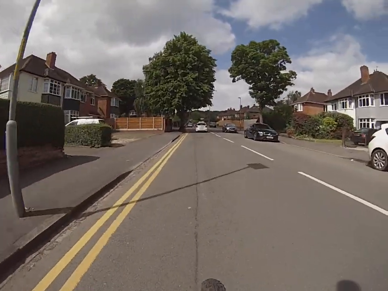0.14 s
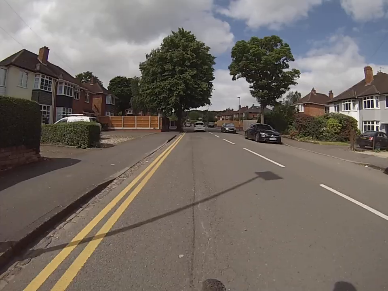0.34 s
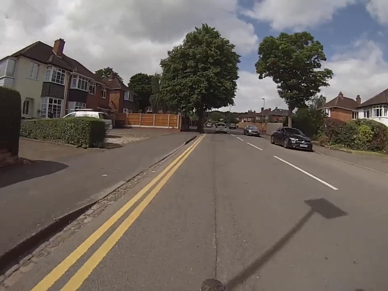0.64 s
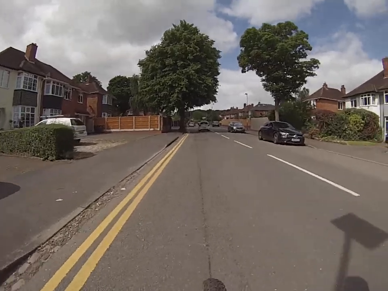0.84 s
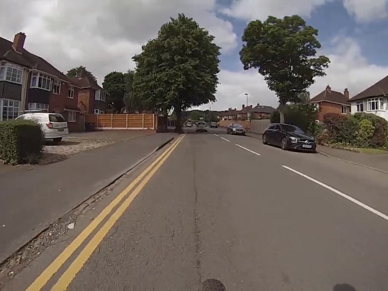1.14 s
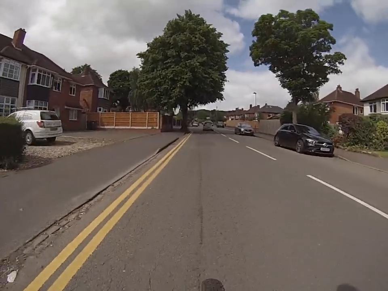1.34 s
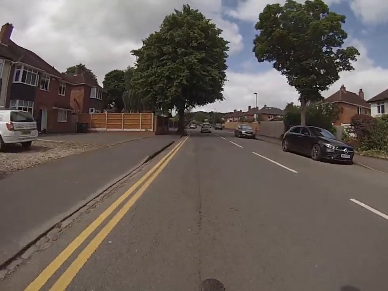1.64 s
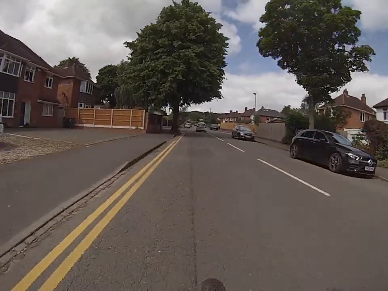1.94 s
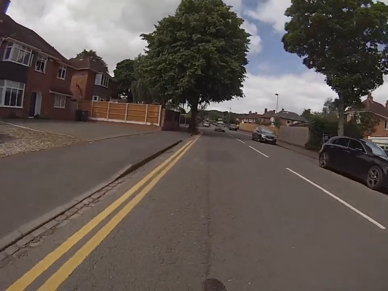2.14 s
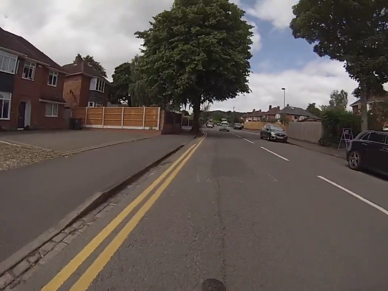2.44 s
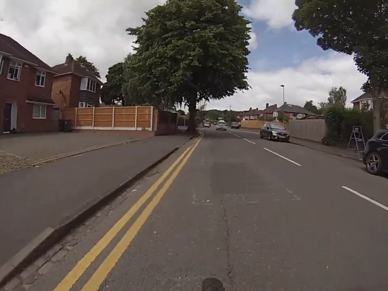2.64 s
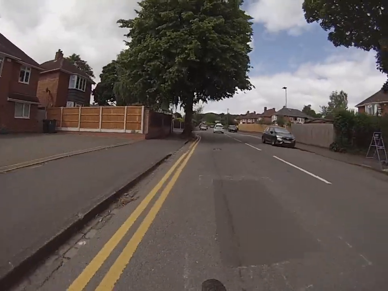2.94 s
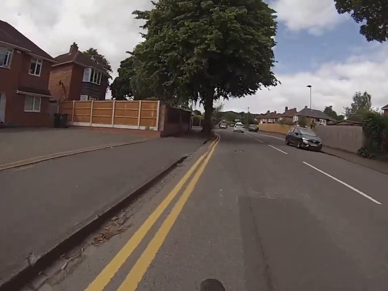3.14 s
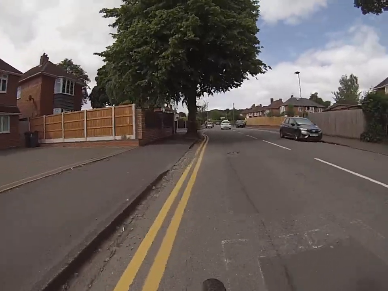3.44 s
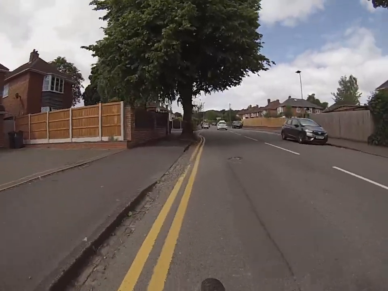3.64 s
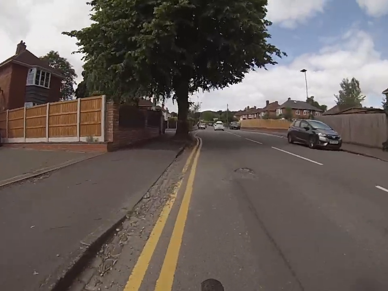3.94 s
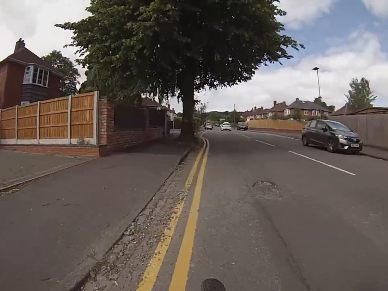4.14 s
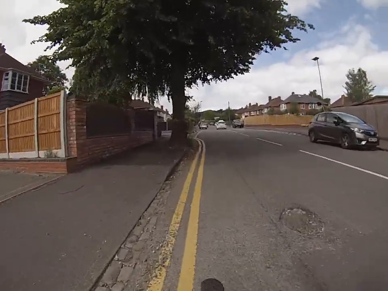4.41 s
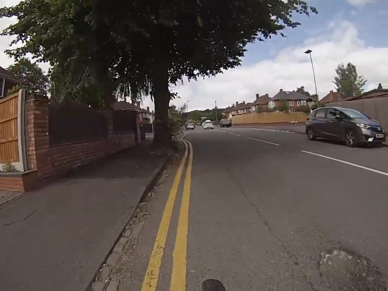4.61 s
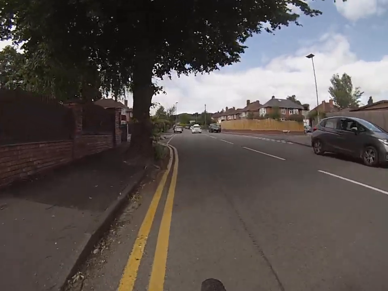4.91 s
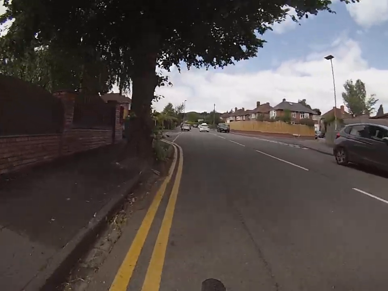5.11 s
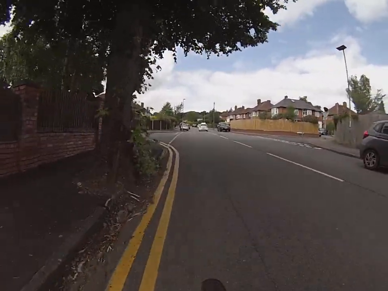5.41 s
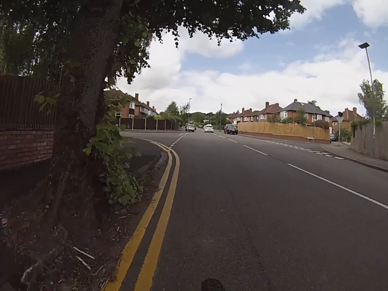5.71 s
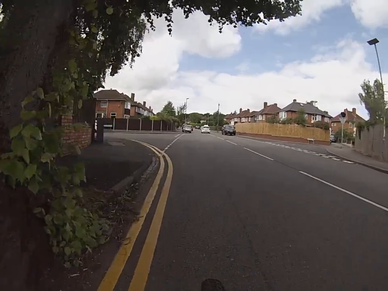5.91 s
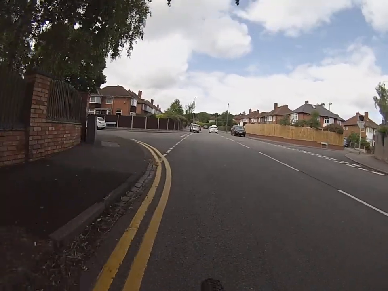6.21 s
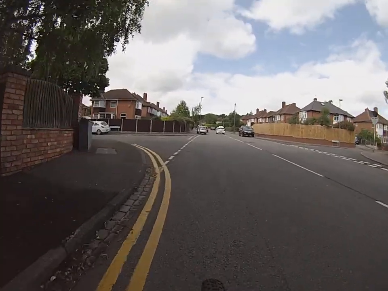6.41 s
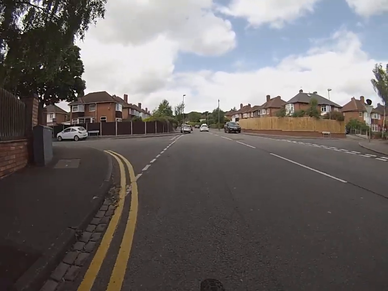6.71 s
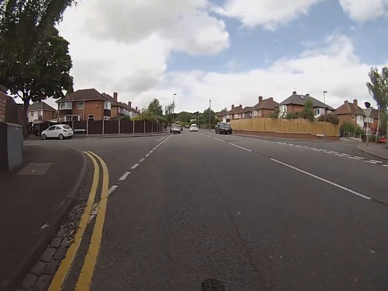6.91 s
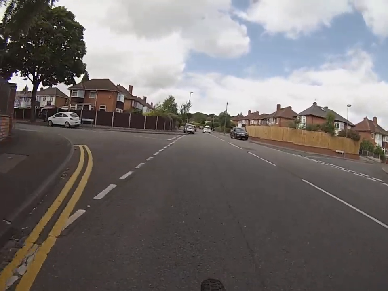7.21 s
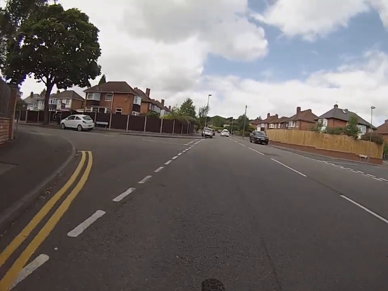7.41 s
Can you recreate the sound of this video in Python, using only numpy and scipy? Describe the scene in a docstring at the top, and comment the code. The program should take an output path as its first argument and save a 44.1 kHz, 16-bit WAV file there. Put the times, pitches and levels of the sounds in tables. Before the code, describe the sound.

Low pulsing hum and muffled road rumble of a bicycle ride, broken by rapid plastic chatter, tiny crackles and sharp closing knocks.

```python
"""A droning, rumbling bicycle ride over rough asphalt, heard from a small camera in a closed housing.
Noise shaped by frame resonances gives rumble and drone; noisy sines hum for mount (near 60 Hz), tyre, tube.
A loose part chatters about twenty times a second in bursts, and knocks sound early on and at the end:
both ring housing modes with rough contacts. Thin crackles are short jumps; a limiter pulls peaks down."""
import sys
import numpy as np
from scipy import signal
from scipy.io import wavfile
from scipy.ndimage import uniform_filter1d

SR = 44100
rng = np.random.default_rng(int(sys.argv[2]) if len(sys.argv) > 2 else 0)


def invert_db(x):
    """Field ratio 10**(x/20) for x, a level in decibels (scalar or array-like)."""
    u = np.asarray(x, float) / 20
    return 10 ** u


def digitize_waveform(pressure):
    """Quantize a signal to 16-bit integers and store it at the path in sys.argv[1].

    Rows of a 2-D input are taken as channels; values are limited to [-1, 1].
    """
    field = np.atleast_2d(pressure).T
    bounded = np.clip(field, -1, 1)
    quanta = np.round(bounded * 32767).astype(np.int16)
    wavfile.write(sys.argv[1], SR, quanta)


N = 333396

# coarseness of the asphalt: t/s, drone level/dB, rumble level/dB
ASPHALT = [(0.0, -27.5, -18), (.3, -28, -22.5), (0.62, -27.5, -20), (1.0, -29, -18.5), (1.5, -30.5, -17.5),
           (2.0, -31.5, -20.5), (2.7, -33.5, -20.5), (3.69, -32.5, -18.5), (4.54, -34, -21),
           (5.04, -33, -19), (5.46, -33.5, -21), (5.93, -31.5, -16), (6.33, -32, -20.5), (6.8, -32, -20),
           (7.45, -30.5, -20)]
LOW_TOP_HZ, MIDDLE_TOP_HZ = 1300, 3900  # borders of the low, middle and upper housing modes
TICK_HARD_HZ, TICK_THIN_HZ = 4200, 1400  # low-pass of the contact, low edge of the middle modes


def evened(x):
    """Scales to rms 1."""
    return x / np.sqrt(np.mean(x ** 2) + 1e-20)


def curve(rows, column):
    """One column of a table at every sample."""
    rows = np.array(rows)
    return np.interp(np.arange(N) / SR, rows[:, 0], rows[:, column])


def filtered(x, order, hz, kind="low"):
    """Butterworth filter."""
    return signal.sosfilt(signal.butter(order, hz, kind, fs=SR, output="sos"), x)


def resonate(x, hz, width_hz):
    """Resonance along the curve hz: shifts it down to zero, smooths twice, shifts back."""
    turn = np.exp(2j * np.pi * np.cumsum(hz) / SR)
    r = np.exp(-np.pi * width_hz / SR)
    smooth = signal.lfilter([(1 - r) ** 2], [1, -2 * r, r * r], x / turn)
    return 2 * (turn * smooth).real


def shaken(points, patchy_db, flicker_db):
    """Random short-time spectra: a broad colour, the frame's peaks, drifting patches, shared flicker."""
    # frame resonances that the road keeps ringing: f/Hz, width/Hz, nominal rise over the colour/dB
    frame_modes = [(141, 2, 5.5), (209.2, 28, 13.5), (338, 33, 7.5), (528.5, 35, 10.5), (566, 56, 4.5),
                   (872, 100, 6.5), (996, 410, 6), (1553, 350, 10.5), (2020, 560, 7.5), (2950, 150, -15.5),
                   (4250, 120, 0.5), (4730, 220, 5.5), (5500, 380, 6.5), (6260, 120, 5.5), (8100, 300, 5.5),
                   (11100, 860, 4.5)]
    frames, hz = N // 512 + 6, np.fft.rfftfreq(2048, 1 / SR)
    real, imag, patches = rng.standard_normal((frames, 1025, 3)).T
    patches = evened(uniform_filter1d(uniform_filter1d(patches, 16, 0), 6, 1))
    flicker = evened(uniform_filter1d(rng.standard_normal(frames), 3))
    f, db = np.transpose(points)
    broad = invert_db(np.interp(np.log(hz + 1), np.log(f + 1), db))
    peaks = sum((invert_db(up_db) ** 2 - 1) / (1 + (2 * (hz - mid_hz) / width_hz) ** 2) ** 2
                for mid_hz, width_hz, up_db in frame_modes)
    colour = broad * np.sqrt(1 + np.maximum(peaks, 0))
    z = (real + 1j * imag) * colour[:, None] * invert_db(patchy_db * patches + flicker_db * flicker)
    return evened(signal.istft(z, nperseg=2048, noverlap=1536)[1][:N])


def ringing(rows, width_hz, rough):
    """A mode kept swinging by the road: steady swing plus narrow noise, rough = noise share of power."""
    hz = curve(rows, 2)
    swing = np.sqrt(2) * np.sin(2 * np.pi * (np.cumsum(hz) / SR + rng.random()))
    fuzz = evened(resonate(rng.standard_normal(N), hz, width_hz))
    return invert_db(curve(rows, 1)) * (np.sqrt(1 - rough) * swing + np.sqrt(rough) * fuzz)


def treble_hiss():
    """Faint high-passed white noise that fades."""
    # white noise ahead of the filter: t/s, level/dB
    hiss_rows = [(0, -77.5), (.4, -78.5), (.8, -90.5), (7.56, -106)]
    return invert_db(curve(hiss_rows, 1)) * filtered(rng.standard_normal(N), 4, 6500, "high")


def rumble():
    """Low noise of wind and road through the housing, its level following the asphalt."""
    # broad colour: f/Hz, relative level/dB
    rumble_colour = [(10, -22), (30, -14.5), (46, 5.5), (90, -5), (170, -12.5), (300, -12), (380, -29.5),
                     (500, -54), (20000, -86)]
    return invert_db(curve(ASPHALT, 2)) * shaken(rumble_colour, patchy_db=1.0, flicker_db=1.0)


def housing_drone():
    """Mid-range noise of the droning housing, its level following the asphalt."""
    # broad colour: f/Hz, relative level/dB
    drone_colour = [(100, -28.5), (350, -1.5), (700, -5.5), (1150, -10), (1300, -22.5), (2300, -29),
                    (3300, -37), (3900, -50), (6500, -53.5), (9000, -72), (12000, -86), (15000, -100),
                    (16500, -110)]
    return invert_db(curve(ASPHALT, 1)) * shaken(drone_colour, patchy_db=1.31, flicker_db=0.7)


def tube_hum():
    """A frame tube that hums on the first stretch."""
    # t/s, level/dB, f/Hz
    tube_rows = [(0, -28, 137.5), (.3, -28.5, 141.4), (.55, -25.5, 143.3), (.75, -56.5, 140.4),
                 (7.56, -54.5, 141)]
    return ringing(tube_rows, 9, rough=0.046)


def tyre_hum():
    """The tyre's air ring: two modes, split where the tyre is flattened on the road."""
    # upper twin: t/s, level/dB, f/Hz
    upper_twin = [(0.0, -17, 280.3), (0.1, -26, 277.1), (0.21, -19.5, 286.3), (0.55, -21.5, 277.2),
                  (0.59, -15, 280.8), (0.97, -24.5, 285.5), (1.35, -27.5, 273.2), (2.32, -26, 274.6),
                  (2.42, -35.5, 277.7), (2.57, -27, 271.0), (2.72, -33, 275.3), (3.43, -29, 275.2),
                  (3.47, -40, 279.6), (3.64, -35, 276.1), (3.81, -39.5, 271.0), (4.1, -25.5, 271.0),
                  (4.21, -36, 273.1), (4.29, -29, 281.5), (4.53, -32, 271.0), (4.61, -30.5, 281.3),
                  (5.01, -29.5, 271.3), (5.03, -21, 273.9), (5.12, -36.5, 286.3), (5.18, -25, 274.0),
                  (6.34, -28.5, 273.0), (6.5, -20, 271.0), (6.95, -34, 271.1), (7.03, -18.5, 271.3),
                  (7.52, -38, 271.3), (7.56, -45.5, 271.0)]
    # lower twin: t/s, level/dB, f/Hz
    lower_twin = [(0.0, -31, 268.3), (0.12, -22.5, 269.4), (0.23, -36.5, 260.9), (0.31, -23, 265.4),
                  (0.44, -23.5, 258.3), (0.59, -30, 269.9), (0.99, -23.5, 262.3), (1.22, -27, 270.5),
                  (1.62, -25, 269.2), (2.04, -24.5, 256.9), (2.27, -29, 270.2), (2.38, -28.5, 260.4),
                  (3.09, -31.5, 261.1), (3.16, -16, 259.8), (3.24, -36, 257.4), (3.41, -27.5, 269.5),
                  (3.56, -39, 267.3), (3.77, -25, 259.4), (3.79, -35, 256.2), (4.02, -29.5, 267.7),
                  (4.63, -32, 256.5), (4.95, -31.5, 270.2), (5.03, -19, 260.6), (5.1, -35, 265.1),
                  (5.62, -27.5, 269.9), (6.3, -28.5, 259.7), (6.46, -22, 266), (7.43, -22.5, 265.1),
                  (7.5, -18.5, 260), (7.56, -36.5, 266)]
    return ringing(upper_twin, 20, rough=0.13) + ringing(lower_twin, 20, rough=0.22)


def mount_bounce():
    """The mount bouncing on the bars near 60 Hz."""
    # t/s, level/dB, f/Hz
    bounce_rows = [(0.0, -17.5, 64.77), (0.19, -11.5, 62.48), (0.27, -18.5, 69.2), (0.34, -9, 65.18),
                   (0.46, -11.5, 64.95), (0.51, -19.5, 65.2), (0.61, -11, 61.69), (0.71, -21, 66.65),
                   (0.99, -11.5, 60.44), (1.05, -7.5, 60.78), (1.14, -26, 57), (1.26, -6, 59.11),
                   (1.47, -11.5, 60.23), (1.83, -11, 59.98), (1.91, -30, 63.26), (2.0, -12, 64.1),
                   (2.04, -22, 63.35), (2.17, -5, 59.55), (2.23, -23, 60.3), (2.3, -8.5, 60.26),
                   (2.36, -6, 57.74), (2.44, -19, 56.12), (2.63, -9, 56.78), (2.76, -6.5, 58.64),
                   (2.84, -24.5, 58.82), (2.92, -10, 58.68), (3.18, -17.5, 58.61), (3.54, -8.5, 61.28),
                   (3.58, -26.5, 60.7), (3.64, -6.5, 59.8), (3.85, -10.5, 59.58), (3.92, -19.5, 61.73),
                   (3.98, -6.5, 61.25), (4.27, -20, 61.02), (4.29, -9, 60), (4.55, -6.5, 59.9),
                   (4.63, -15.5, 59), (4.88, -12.5, 58.93), (4.93, -25, 58.2), (4.99, -8, 59.7),
                   (5.05, -10, 61.54), (5.12, -34, 62.9), (5.18, -7.5, 59.5), (5.24, -19, 58.1),
                   (5.28, -9.5, 58.83), (5.43, -16, 58.33), (5.66, -14.5, 54.56), (5.75, -34, 53.9),
                   (5.81, -16, 54.9), (5.89, -16.5, 62.3), (5.94, -11, 61.4), (6.38, -12, 58.7),
                   (6.65, -13, 61.47), (6.78, -21.5, 59.7), (6.95, -10.5, 59.3), (6.99, -17, 60),
                   (7.14, -16.5, 67.7), (7.22, -24, 60.3), (7.37, -16, 59.4), (7.56, -24, 62.9)]
    return ringing(bounce_rows, 20, rough=0.21)


def crackles():
    """Each crackle is a sudden jump of either sign that falls back at once."""
    # t/s, peak level in the treble band/dB
    crackle_rows = [(0.2844, -58), (1.0017, -61), (1.007, -61.5), (1.3442, -58), (1.4508, -59.5),
                    (1.7063, -61), (2.3552, -54.0), (2.3642, -49.5), (2.589, -56), (2.5946, -65),
                    (2.655, -58.5), (2.685, -62), (2.6983, -46.5), (2.7082, -61), (2.747, -49.5),
                    (2.754, -53), (2.7708, -59), (2.941, -52.5), (3.021, -53.5), (3.4583, -57.5),
                    (3.4947, -46), (3.5169, -58), (3.9676, -58), (4.0071, -57.0), (4.0317, -52),
                    (4.0556, -56), (4.0588, -59), (4.0738, -61.0), (4.3117, -60), (4.3225, -49.5),
                    (4.4206, -50), (4.424, -55.5), (4.4268, -61.5), (4.4356, -46), (4.4434, -56),
                    (4.5066, -66), (4.5416, -59), (4.5488, -58), (4.5544, -59), (4.5584, -57.0),
                    (5.2949, -50), (5.6934, -60), (6.1015, -56.5), (6.3702, -59.5)]
    fall_s, top_hz, treble_hz = 0.0003, 7000, (6800, 12000)
    jump = filtered(np.exp(-np.arange(200) / SR / fall_s), 2, top_hz)
    envelope = abs(signal.hilbert(filtered(jump, 2, treble_hz, "band")))
    jump /= uniform_filter1d(envelope, size=44).max()  # peak averaged over 1 ms
    s, db = np.transpose(crackle_rows)
    train = np.zeros(N)
    train[(s * SR).astype(int)] = invert_db(db) * rng.choice([-1, 1], len(s))
    return signal.oaconvolve(train, jump)[:N]


def blows(rows, touch):
    """A sharp touch and short rough contact ring low, middle and upper housing modes; dry cracks join in.

    rows: t/s, middle-mode level/dB, upper and low modes re middle/dB, contact decay/s,
    contact low-pass/Hz, low edge of middle modes/Hz. touch: first touch over grit rms.
    """
    # what a blow on the housing rings with: f/Hz, level within its group/dB, t60/s
    housing_modes = [(340, -6, 0.014), (428, -8, 0.017), (540, 0, 0.016), (690, -7.5, 0.015),
                     (840, 3.5, 0.017), (980, -1, 0.0083), (1170, -3.5, 0.016), (1445, -5.5, 0.02),
                     (1681, 2, 0.019), (1850, -8, 0.028), (2047, 2.5, 0.02), (2200, 1, 0.016),
                     (2404, 1, 0.018), (2640, -11, 0.025), (2780, -5.5, 0.019), (2954, -0.5, 0.018),
                     (3068, -2.5, 0.015), (3250, -5, 0.012), (3400, -8.5, .016), (3490, -17, 0.023),
                     (4300, -8.5, 0.026), (4610, -17.5, 0.021), (4800, -15, 0.026), (5270, -8.5, 0.02),
                     (5460, -4.5, 0.024), (5664, -5.5, 0.019), (5960, -7.5, 0.015), (6390, -3, 0.022),
                     (6850, -15, 0.021), (7200, -19.5, 0.012), (8056, -2, 0.01), (8710, -11, 0.011),
                     (9600, -23.5, 0.0076), (11000, -20.5, 0.011), (10200, -21, .008), (11500, -18.5, .008),
                     (12100, -17.5, .008), (12700, -16.5, .012), (13200, -16.5, .007), (13900, -13.5, .008),
                     (14500, -19, .01)]
    rise_s, crack_decay_s = 0.00066, 0.0052
    crack_bands_hz = (450, 1400), (2000, 3300), (5130, 6760)
    crack_db = np.array([[-10.5], [-13.5], [-12.5]])  # re low, middle, upper modes
    t, out = np.arange(3000) / SR, np.zeros(N + 4000)
    short_t = t[:800]

    rings = np.zeros((3, 3000))
    for k, (hz, db, t60) in enumerate(housing_modes):
        group = int(hz > LOW_TOP_HZ) + int(hz > MIDDLE_TOP_HZ)
        rings[group] += (-1) ** k * invert_db(db - 60 * t / t60) * np.sin(2 * np.pi * hz * t)
    rings *= (1 - np.exp(-t / rise_s)) ** 2  # the blow spreads through the shell before it rings fully

    grit = rng.standard_normal((len(rows), 800))
    noise = rng.standard_normal((len(rows), 800))
    cracks = np.stack([filtered(noise, 4, band, "band") for band in crack_bands_hz], axis=1)
    cracks *= (1 - np.exp(-short_t / rise_s)) * np.exp(-short_t / crack_decay_s)

    for row, push, crack in zip(rows, grit, cracks):
        s, db, high_db, low_db, contact_s, hard_hz, thin_hz = row
        push = push * np.exp(-short_t / contact_s)
        push[0] = touch  # the first touch is alike every time
        push = filtered(push, 2, hard_hz)  # a softer blow drives high modes less
        parts = signal.fftconvolve(rings, push[None], axes=1)
        parts[1] = filtered(parts[1], 3, min(thin_hz, MIDDLE_TOP_HZ), "high")
        parts /= abs(parts).max(1, keepdims=True)
        parts[:, :800] += invert_db(crack_db) * crack / abs(crack).max(1, keepdims=True)
        low, middle, upper = parts
        sound = invert_db(db) * (invert_db(low_db) * low + middle + invert_db(high_db) * upper)
        start = round(s * SR)
        out[start:][:len(sound)] += sound[:len(out) - start]
    return out[:N]


def faint_ticks():
    """Rows for light touches of the loose part at random moments, levels exponentially spread in dB."""
    per_s, floor_db, mean_rise_db = 9, -48.5, 3
    when, size = rng.random((round(per_s * N / SR), 2)).T
    return [(s * N / SR, floor_db - mean_rise_db * np.log(1 - u), -27, -2.5, 0.002, TICK_HARD_HZ, TICK_THIN_HZ)
            for s, u in zip(when, size)]


def chatter():
    """The loose part's ticks: lighter ones are thinner and ring the upper modes less."""
    # t/s, middle-mode level/dB
    tick_rows = [(.227, -41), (0.293, -40), (.391, -41), (0.5404, -28.5), (0.5896, -29.5), (0.622, -26.5),
                 (0.6588, -25), (0.7, -38), (0.735, -35), (.748, -39), (.8155, -44.5), (1.0187, -45),
                 (1.031, -38), (1.039, -41), (1.346, -17), (1.3964, -14.5), (1.578, -24), (1.6311, -17),
                 (1.6816, -14), (1.732, -14), (1.986, -35), (2.167, -23.5), (2.2049, -32), (2.271, -31.5),
                 (2.34, -29), (2.384, -34), (2.4367, -26), (2.4855, -21), (2.5352, -17), (2.587, -20.5),
                 (2.652, -26.5), (2.708, -27.5), (2.7583, -17.5), (2.799, -25), (2.811, -13), (2.8618, -13),
                 (2.917, -38), (3.059, -40), (3.1085, -28), (3.1607, -31), (3.476, -32.5), (3.617, -43),
                 (3.973, -19), (4.0235, -12), (4.075, -14), (4.125, -15.5), (4.1695, -17.5),
                 (4.2192, -11.5), (4.268, -11), (4.3196, -15.5), (5.078, -25.5), (5.2508, -31),
                 (5.403, -42), (5.47, -23.5), (5.531, -29), (5.641, -26), (5.6881, -17.5), (5.7362, -12.5),
                 (5.7853, -12.5), (5.8328, -14.5), (5.884, -15.5), (5.996, -22.5), (6.052, -21),
                 (6.159, -34), (6.208, -20), (6.2566, -17), (6.3063, -20), (6.348, -34), (6.4093, -41),
                 (6.472, -36), (6.4823, -31), (6.52, -37.5), (6.694, -38.5), (6.772, -34), (6.9124, -36),
                 (7.293, -26), (7.3197, -23), (7.393, -28), (7.429, -31)]
    firm_db, bright_db, low_db, contact_s = -15.5, -18, -15, 0.0028
    dulling_db_per_db, thinning_hz_per_db = 0.38, 89.5
    ticks = []
    for s, db in tick_rows:
        lighter_db = max(firm_db - db, 0)
        high_db = bright_db - dulling_db_per_db * lighter_db
        thin_hz = TICK_THIN_HZ + thinning_hz_per_db * lighter_db
        ticks.append((s, db, high_db, low_db, contact_s, TICK_HARD_HZ, thin_hz))
    return blows(ticks + faint_ticks(), touch=14)


def seam_knocks():
    """Knocks over a rough seam: weaker ones touch more briefly, harder contacts lose lows."""
    # t/s, middle-mode level/dB, upper modes re middle/dB, low modes re middle/dB, contact low-pass/Hz
    knock_rows = [(0.7721, -23, -32, 3, 1600), (.7765, -23, -32, 10, 2000), (.782, -34, -29, 8, 1500),
                  (7.1749, -3.5, -11.5, -13, 14400), (7.325, -28.5, -25, 11, 1500),
                  (7.3500, -22, -20, -16, 6000), (7.3538, -15, -28.5, -4, 1800),
                  (7.3563, -3, -34, -18, 2200), (7.3640, -32, -27, -2, 1800), (7.485, -25.5, -33, 13, 1000),
                  (7.4890, -21.5, -32, 13, 1200), (7.4925, -22, -25, 10, 1800),
                  (7.4961, -21, -41, -1, 1400), (7.5010, -26, -32, 16, 1200), (7.5047, -31, -31, 19, 1000),
                  (7.5075, -38, -30, 7, 1210), (7.5225, -29, -39, 8, 1190), (7.5255, -29, -34, 7, 1800),
                  (7.5310, -8, -40, 7.5, 1290), (7.5340, -12.5, -28, 7, 1500), (7.5385, -26, -28, 12, 1300),
                  (7.5430, -26, -28, 4.5, 1400), (7.5513, -11.5, -25, 11.5, 1213),
                  (7.5548, -10, -17, 3.5, 2950)]
    strong_db, contact_s, shortening_s_per_db, shortest_s = -7.5, 0.0026, 0.1, 0.0002
    soft_hz, thin_hz, thin_share = 1500, 300, 0.12
    knocks = []
    for s, db, high_db, low_db, hard_hz in knock_rows:
        touch_s = max(contact_s - shortening_s_per_db * max(strong_db - db, 0), shortest_s)
        edge_hz = thin_hz + thin_share * max(hard_hz - soft_hz, 0)
        knocks.append((s, db, high_db, low_db, touch_s, hard_hz, edge_hz))
    return blows(knocks, touch=9)


def scene():
    """Sums road, hums, crackles, chatter and knocks into one channel."""
    road = treble_hiss() + rumble() + housing_drone()
    hums = tube_hum() + tyre_hum() + mount_bounce()
    return (road + hums + crackles() + chatter() + seam_knocks())[None]


def low_pass(x):
    """Removes everything above the highest recorded frequency."""
    return signal.sosfilt(signal.butter(12, 15900, fs=SR, output="sos"), x)


def record(dry):
    """A clocked limiter glides the gain down at tall swings and steps it back up; steps click faintly."""
    checks_per_s, checks_per_recovery = 1500, 4
    limit_db, cut_step_db, recover_step_db = -3.5, 0.16, 0.09
    edges = np.arange(0, N, SR / checks_per_s).astype(int)
    peak_db = 20 * np.log10(np.maximum.reduceat(abs(dry[0]), edges) + 1e-9)
    steps_db, now_db = np.zeros((2, len(edges))), 0.0  # rows: cuts, recoveries
    for k, db in enumerate(peak_db):
        if db + now_db > limit_db:
            steps_db[0, k] = -cut_step_db
        elif k % checks_per_recovery == 0:
            steps_db[1, k] = min(recover_step_db, -now_db)
        now_db += steps_db[:, k].sum()
    cut_db, back_db = np.repeat(np.cumsum(steps_db, axis=1), np.diff(edges, append=N), axis=1)
    glide_db = uniform_filter1d(uniform_filter1d(cut_db, size=59), size=59)
    held = dry * invert_db(glide_db + uniform_filter1d(back_db, size=3))
    held *= signal.windows.tukey(N, 120 / N)  # soft ends
    return low_pass(np.clip(held, -0.995, 0.995))


dry = scene()
out = record(dry)
digitize_waveform(out)
```